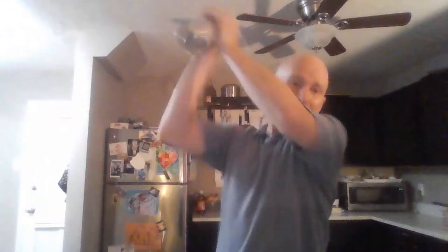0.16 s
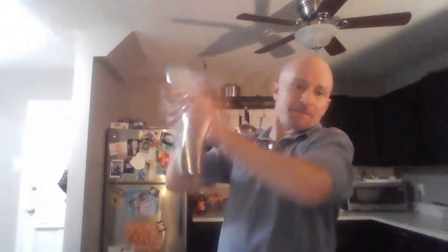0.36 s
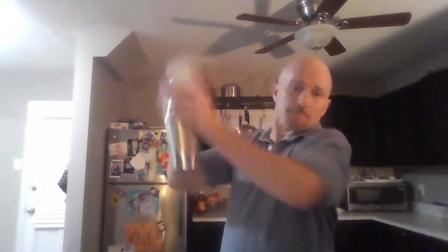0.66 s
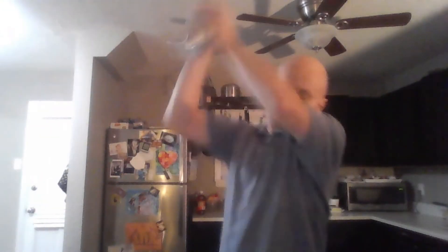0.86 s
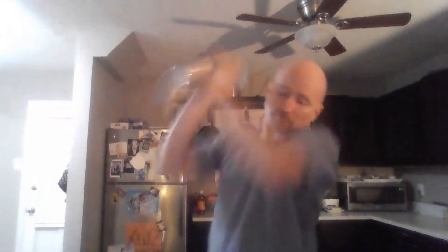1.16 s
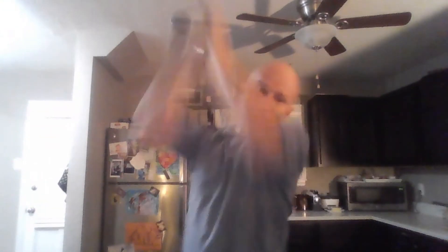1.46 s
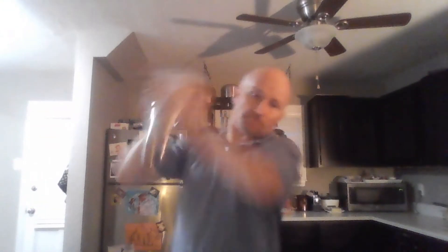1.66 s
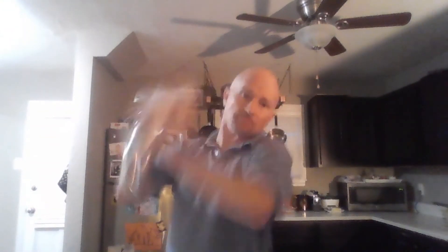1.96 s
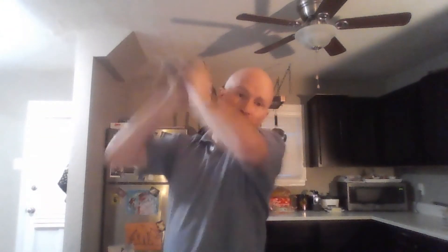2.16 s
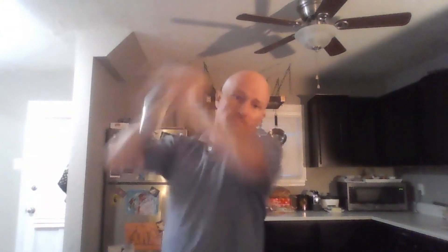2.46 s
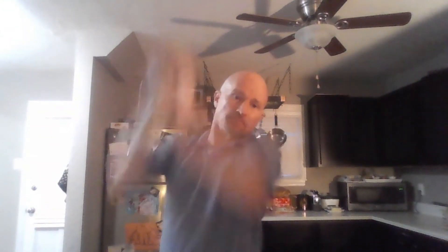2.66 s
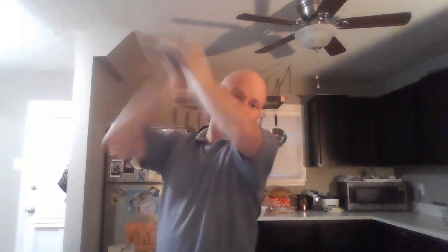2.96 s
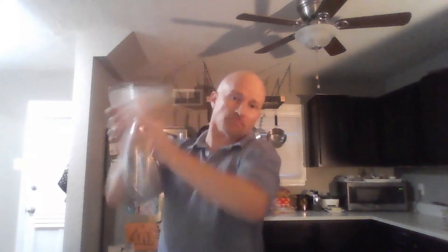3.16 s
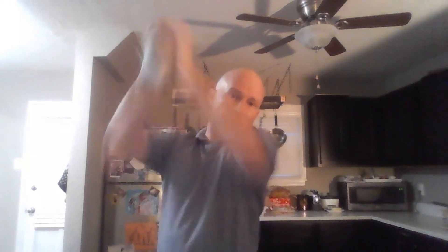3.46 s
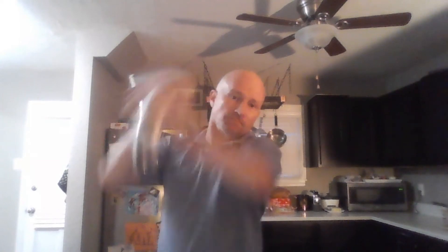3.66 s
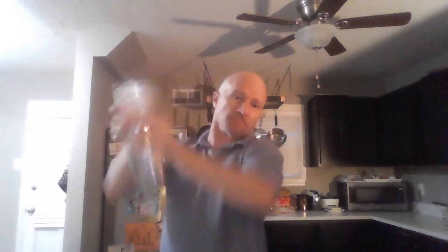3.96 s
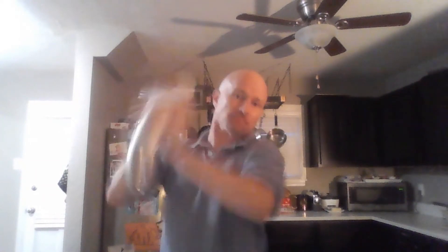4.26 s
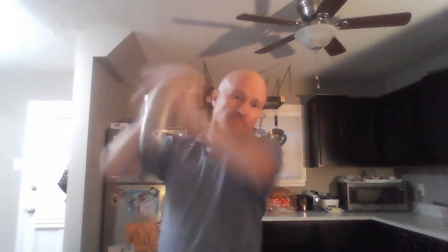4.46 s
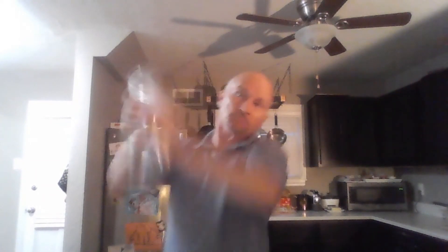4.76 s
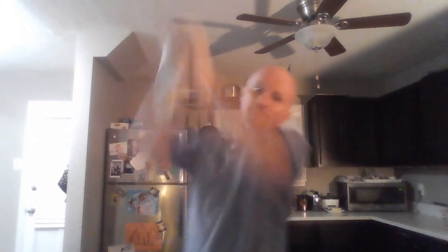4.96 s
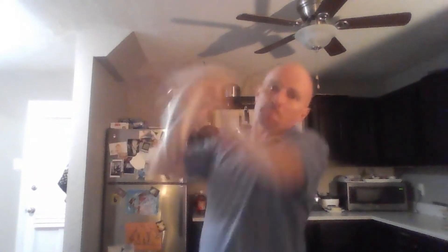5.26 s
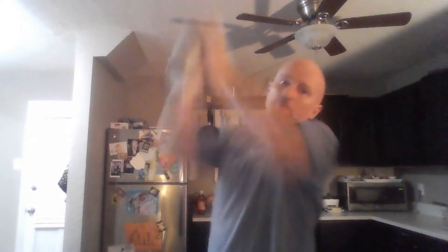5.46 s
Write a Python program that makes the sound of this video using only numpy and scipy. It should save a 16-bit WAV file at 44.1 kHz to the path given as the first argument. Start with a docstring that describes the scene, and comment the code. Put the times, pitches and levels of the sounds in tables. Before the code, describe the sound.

Ice rattles hard and liquid sloshes inside a steel and glass cocktail shaker, shaken in a fast rhythm in a kitchen.

```python
"""Kitchen: a steel and glass cocktail shaker, shaken hard a couple of metres from a small microphone.
Ice and liquid slam into one end five times a second; hands and liquid damp each knock within milliseconds.
The drink's mass lowers the tin's ring. Small ice rattles between strokes, the drink splashes and gurgles,
and the hard room smears it all."""
import sys
import numpy as np
from scipy import signal
from scipy.fft import rfft, irfft
from scipy.io import wavfile

SR = 44100
rng = np.random.default_rng(int(sys.argv[2]) if len(sys.argv) > 2 else 0)


def master(y):
    """Save y as 16-bit WAV."""
    cut = np.clip(np.atleast_2d(y).T, -1, 1)
    pcm = np.round(cut * 32767)  # scale
    wavfile.write(sys.argv[1], SR, pcm.astype(np.int16))


N = 246959

# small ice tumbling: t/s, level/dB
RATTLE_LEVELS = [(0.0, -43.5), (0.4, -38), (0.8, -34), (1.2, -33.5), (1.6, -37), (2.0, -35.5), (2.4, -36),
                 (2.8, -40), (3.2, -42), (3.6, -37.5), (4.0, -37), (4.4, -32.5), (4.8, -42), (5.2, -37),
                 (5.6, -33)]
# loudest cube strikes: t/s, ring level/dB, crack level/dB re ring
CUBE_KNOCKS = [(0.003, -35, 7.5), (0.072, -34, 2.5), (0.0935, -27.5, -4.5), (0.2208, -35.5, 1),
               (0.237, -23, -18), (0.3597, -33.5, 3.5), (0.4124, -43, 10), (0.439, -45, 12),
               (0.457, -47, 12), (0.4875, -26, 0), (0.4986, -30, -3), (0.599, -36.5, -2), (0.6381, -30, -7),
               (0.679, -32, -10), (0.7389, -33, -3.5), (0.756, -27.5, 0), (0.8076, -37, 7.5),
               (0.8489, -23, 2), (0.8517, -20, -14), (0.8639, -21.5, -5), (0.995, -29.5, -3.5),
               (1.009, -34.5, 2), (1.083, -43.5, 10.5), (1.1387, -37.5, 1.5), (1.1783, -43.5, 5.5),
               (1.2572, -37.5, 6.5), (1.294, -35, 0), (1.337, -30, 3), (1.3902, -18, -10.5),
               (1.4088, -33.5, 5), (1.425, -26, -13), (1.516, -33.5, -1.5), (1.5259, -33, -2),
               (1.5699, -29.5, 0.5), (1.659, -34, 9.5), (1.7207, -35.5, 7), (1.737, -38, 6),
               (1.7514, -47.5, 10.5), (1.7699, -27.5, -6), (1.7764, -21, -2.5), (1.7928, -29, 0),
               (1.8857, -31.5, -4.5), (1.92, -30, 5), (1.927, -25, -5), (1.9394, -25, 3),
               (2.0646, -42.5, 15.5), (2.1165, -40.5, 11.5), (2.1746, -23, -4), (2.2127, -31, 0),
               (2.2698, -25, 3.5), (2.279, -18.5, -4), (2.448, -27.5, -6.5), (2.469, -36, -7),
               (2.4916, -29, -2), (2.5218, -25, -11), (2.568, -30.5, -3.5), (2.6523, -38.5, -3),
               (2.761, -33.5, -5), (2.8256, -34, -1.5), (2.836, -39.5, 5), (2.866, -42, 11.5),
               (2.8802, -28.5, -8), (2.8982, -30, 5), (2.905, -34, -8), (2.9164, -24, -7.5),
               (3.0155, -34, -13), (3.043, -30.5, -6), (3.0675, -31, 2.5), (3.082, -24.5, 3),
               (3.0983, -37.5, 10), (3.1422, -29.5, 1.5), (3.2287, -32.5, 4.5), (3.262, -30, -10),
               (3.2782, -29.5, -4), (3.291, -40, 13), (3.312, -32, -5), (3.3479, -22, -10),
               (3.3599, -34, -15), (3.4395, -28.5, -8), (3.4968, -31, 5), (3.542, -28, -5.5),
               (3.6243, -36.5, 6), (3.663, -31, -0.5), (3.6783, -28, 4), (3.6854, -27, -4),
               (3.7129, -29.5, -1), (3.7368, -26, -3.5), (3.811, -31.5, -15), (3.8304, -42, -11),
               (3.862, -27.5, -0.5), (3.8836, -18, -5.5), (3.9363, -28, -3.5), (3.9954, -43, 9),
               (4.0682, -28, 5.5), (4.0843, -26, -4), (4.1205, -41.5, 6.5), (4.1612, -31.5, -1.5),
               (4.2214, -30.5, -1.5), (4.2432, -34, -1.5), (4.283, -27, -8), (4.3254, -29.5, 1.5),
               (4.4494, -31, -3), (4.454, -24.5, -22), (4.4602, -27.5, 1.5), (4.4883, -27, -5.5),
               (4.6355, -32.5, 1), (4.6611, -29, 0.5), (4.8212, -25, -9), (4.8648, -21, -11),
               (4.879, -26, -8), (4.9382, -37, -3), (5.0206, -31, -23), (5.0385, -34.5, 0.5),
               (5.0709, -18, -6), (5.1855, -28.5, -4), (5.192, -30.5, -2.5), (5.2504, -22, -3),
               (5.2758, -27.5, -10), (5.2895, -24, -6.5), (5.3123, -24.5, -9), (5.485, -23.5, -7)]
# cubes splitting: t/s, level/dB
CUBE_SNAPS = [(0.0725, -30.5), (0.488, -23.5), (0.827, -33), (0.857, -24), (1.0828, -28.5), (1.3916, -27),
              (2.0646, -32), (2.1745, -32)]
# drink piling up in one end: peak t/s, half length/s, splash level/dB, loaded ring f/Hz
SURGES = [(0.085, 0.037, -30, 1660), (0.497, 0.03, -37.5, 1540), (0.602, 0.014, -58, 1350),
          (0.862, 0.023, -42, 1730), (1.411, 0.049, -38.5, 1570), (1.516, 0.011, -36.5, 1210),
          (1.786, 0.051, -29, 1676), (1.885, 0.01, -44, 1230), (2.196, 0.031, -30.5, 1670),
          (2.516, 0.072, -34, 1466), (2.668, 0.021, -34, 1300), (2.903, 0.069, -29.5, 1590),
          (3.049, 0.015, -40, 1250), (3.311, 0.056, -37, 1540), (3.451, 0.018, -47, 1420),
          (3.718, 0.065, -31.5, 1680), (4.104, 0.056, -34, 1610), (4.218, 0.014, -36.5, 1470),
          (4.46, 0.039, -29.5, 1620), (4.623, 0.015, -32, 1690), (4.869, 0.035, -28, 1674),
          (5.02, 0.021, -51, 1410), (5.283, 0.057, -34, 1820)]
# large air pockets closing: t/s, f/Hz, level/dB
AIR_POCKETS = [(0.082, 220, -25.5), (0.858, 670, -23), (1.401, 574, -26), (2.269, 686, -23.5),
               (2.517, 497, -22.5), (3.348, 612, -35.5), (3.44, 896, -27.5), (4.217, 886, -24),
               (4.449, 571, -21.5), (4.467, 462, -21), (4.486, 364, -19.5), (4.936, 636, -29),
               (5.02, 864, -21.5)]
# ice pack landing at the end of a stroke: t/s, length/s, level/dB
PACK_LANDINGS = [(0.094, 0.0095, -38), (0.245, 0.044, -31), (0.485, 0.022, -25.5), (0.851, 0.021, -24.5),
                 (1.411, 0.014, -25), (1.775, 0.022, -40), (1.922, 0.034, -28), (2.178, 0.028, -41),
                 (2.273, 0.017, -23.5), (2.492, 0.034, -31.5), (2.69, 0.015, -25), (2.9, 0.035, -29.5),
                 (3.086, 0.033, -28), (3.288, 0.017, -34.5), (3.352, 0.014, -52), (3.498, 0.012, -27),
                 (3.678, 0.02, -30), (3.738, 0.01, -48), (3.864, 0.032, -28), (4.064, 0.022, -49),
                 (4.453, 0.014, -32), (4.66, 0.013, -27), (4.86, 0.026, -33), (5.071, 0.014, -28.5),
                 (5.254, 0.044, -33)]
# brittle ice contact: f/Hz, gain/dB
CONTACT_EQ = [(200, 9), (2400, 5.5), (4000, -0.5), (6000, -8), (9300, -13), (11000, -18.5), (13500, -10.5),
              (16000, -26)]
# kitchen echo: f/Hz, gain/dB
ECHO_EQ = [(100, 4), (300, -7), (800, -2), (1700, -3.5), (3500, -2.5), (8000, -2.5), (15000, -8.5)]
# kitchen decay: f/Hz, t60/s
ECHO_T60 = [(200, 0.35), (550, 0.44), (1400, 0.3), (3700, 0.3), (9700, 0.26), (16000, 0.63)]
# still room air: f/Hz, relative density/dB
AIR_SPECTRUM = [(30, -14), (100, 2.5), (160, 13.5), (400, 3), (2000, -40), (16000, -54)]
# microphone response: f/Hz, gain/dB
MIC_EQ = [(30, -22), (90, -16.5), (150, -1.5), (260, -3.5), (430, 2), (620, 2.5), (800, 2), (1050, 4),
          (1700, 2), (2400, 0), (5700, 5.5), (6600, 3.5), (9000, 7), (14000, -7), (15500, -4)]

HIT_S = np.arange(1024) / SR  # time axis of one hit
EMPTY_RING_HZ, RING_SCATTER = 1943, 0.093  # scatter: deviation of ln f
WEAR_DB_PER_S = 1.0  # cube edges round off, the top treble fades


def undb(db):
    """Decibels to gain."""
    return 10 ** (np.asarray(db) / 20)


def unit(x):
    """Scale to rms 1."""
    return x / np.sqrt(np.mean(x ** 2))


def struck(x):
    """Scale each row to rms 1 over its first 4 ms."""
    return x / np.sqrt(np.mean(x[:, :176] ** 2, axis=1, keepdims=True))


def fade(t, t60_s):
    """Exponential decay."""
    return np.exp(-np.log(1000) * t / t60_s)


def along(points, hz):
    """Interpolate (f/Hz, value) points over log frequency."""
    point_hz, values = np.transpose(points)
    return np.interp(np.log(np.maximum(hz, 1)), np.log(point_hz), values)


def colour(x, points, size=2048):
    """Minimum-phase filter from (f/Hz, gain/dB) points."""
    cepstrum = irfft(np.log(undb(along(points, np.fft.rfftfreq(size, 1 / SR)))))
    cepstrum[1:size // 2] *= 2
    cepstrum[size // 2 + 1:] = 0
    response = irfft(np.exp(rfft(cepstrum))).reshape((1,) * (x.ndim - 1) + (-1,))
    return signal.fftconvolve(x, response, axes=-1)[..., :x.shape[-1]]


def band(x, lo_hz, hi_hz, order=2):
    """Band-pass."""
    return signal.sosfilt(signal.butter(order, [lo_hz, hi_hz], "band", fs=SR, output="sos"), x)


def burst(count, t60_s, lo_hz, hi_hz):
    """One decaying noise band per row."""
    return struck(band(rng.standard_normal((count, len(HIT_S))) * fade(HIT_S, t60_s), lo_hz, hi_hz))


def place(at_s, sounds):
    """Sum short sounds onto the time line."""
    out = np.zeros(N)
    for start, sound in zip((np.maximum(at_s, 0) * SR).astype(int), sounds):
        out[start:start + len(sound)] += sound[:max(N - start, 0)]
    return out


def place_hits(at_s, level_db, parts):
    """Mix (rows, relative level/dB) parts and place the hits."""
    return place(at_s, sum(part * undb(level_db + rel_db)[:, None] for part, rel_db in parts))


def load(at_s):
    """Fill (0-1) and ring f/Hz of the struck end; the drink's mass lowers the ring."""
    peak_s, half_s, _, full_hz = np.transpose(SURGES)
    fills = np.exp(-((at_s[:, None] - peak_s) / half_s) ** 4)
    fill = fills.max(axis=1)
    return fill, EMPTY_RING_HZ + fill * (full_hz[fills.argmax(axis=1)] - EMPTY_RING_HZ)


def tin_ring(hz, t60_s, rise_s):
    """One damped mode per row, swelling while the ice presses on the wall."""
    mode = np.sin(2 * np.pi * hz[:, None] * HIT_S) * fade(HIT_S, t60_s)
    return struck(mode * (1 - np.exp(-HIT_S / rise_s)))


def ice_contact(count, tau_s, tones_db, tones_t60_s, seat_s=0.00024):
    """Brittle crack as ice seats on the wall, plus six short tones that vary with cube and strike point."""
    envelope = np.exp(-HIT_S / tau_s) * (1 - np.exp(-HIT_S / seat_s))
    crack = struck(rng.standard_normal((count, len(HIT_S))) * envelope)
    modes_hz = 2400 * (14000 / 2400) ** rng.random((count, 6)).T
    tones = sum(np.sin(2 * np.pi * hz[:, None] * HIT_S) * rng.standard_normal((count, 1))
                for hz in modes_hz)
    return colour(crack + undb(tones_db) * struck(tones * fade(HIT_S, tones_t60_s)), CONTACT_EQ)


def shards(at_s, level_db):
    """Pieces hit the wall: big ones ring it, small ones tick; a full end shifts clack towards tick."""
    detune, smallness = rng.standard_normal((len(at_s), 2)).T
    fill, ring_hz = load(at_s)
    ring = tin_ring(ring_hz * np.exp(0.11 * detune), t60_s=0.0071, rise_s=0.00041)
    crack = ice_contact(len(at_s), tau_s=0.0017, tones_db=-5.5, tones_t60_s=0.0066)
    clack = struck(band(crack, 2000, 6000))
    tick = struck(band(crack, 6000, 19000))
    return place_hits(at_s, level_db, [
        (ring, -3.5 - 3.6 * smallness),
        (clack, -0.8 - 1.7 * fill),
        (tick, -6 + 3 * smallness + 1.64 * fill - 0.45 * WEAR_DB_PER_S * at_s)])


def small_ice(count=1450):
    """Chips and glancing cubes rattle at random, a few large among many tiny."""
    jitter, smallness = rng.random((count, 2)).T
    at_s = (np.arange(count) + jitter) / count * N / SR
    rattle_db = np.interp(at_s, *np.transpose(RATTLE_LEVELS))
    return shards(at_s, rattle_db + 0.5 - 24.3 * smallness ** 0.78)


def liquid(count=1300, rise_s=0.01):
    """Drink flung with the cubes: short rising bubble tones over a splashing wash."""
    knock_s, knock_db, _ = np.transpose(CUBE_KNOCKS)
    peak_s, _, splash_db, _ = np.transpose(SURGES)
    t = np.arange(SR // 4) / SR
    stir_power = (undb(knock_db - 15)[:, None] * fade(t, 0.082)) ** 2
    splash_power = undb(splash_db)[:, None] ** 2 * np.minimum(t / rise_s, fade(t - rise_s, 0.34) ** 2)
    power = place(knock_s - 0.002, stir_power) + place(peak_s - rise_s, splash_power) + undb(-45.5) ** 2
    when, pitch, strength = rng.random((count, 3)).T
    hz = 230 * (1500 / 230) ** pitch[:, None]
    bubbles = np.sin(2 * np.pi * hz * HIT_S * (1 + 3 * HIT_S)) * fade(HIT_S, 11 / hz)
    churn = unit(place(when * N / SR, bubbles * undb(20 * strength)[:, None]))
    wash = unit(band(rng.standard_normal(N), 137, 1550))
    return undb(-11.5) * (churn + wash) * np.sqrt(power)


def knocks():
    """Each cube rings the end of the tin, thuds against the liquid and cracks in the treble."""
    at_s, level_db, crack_db = np.transpose(CUBE_KNOCKS)
    count = len(at_s)
    fill, ring_hz = load(at_s)
    detune, sharpness = rng.standard_normal((count, 2)).T
    # re a medium blow; harder ones crush the ice: longer, duller
    force_db = level_db + np.maximum(crack_db, 0) + 24.5
    crack_tau_s = 0.0022 * undb(0.33 * force_db)[:, None]
    ring_t60_s = 0.011 * undb(0.57 * force_db)[:, None]
    crack = ice_contact(count, crack_tau_s, tones_db=-7.5, tones_t60_s=0.017, seat_s=0.00046)
    shell = burst(count, t60_s=0.013, lo_hz=1156, hi_hz=2170)
    mode = tin_ring(ring_hz * np.exp(RING_SCATTER * detune), ring_t60_s, rise_s=0.0017)
    ring = struck(mode + undb(-8) * shell)
    thud = burst(count, t60_s=0.033, lo_hz=283, hi_hz=690)
    clack = struck(band(crack, 2260, 5700, order=3))
    # only sharp edges splinter up to the top octave
    edge_db = 3.5 - WEAR_DB_PER_S * at_s + 3 * sharpness
    edge = undb(edge_db)[:, None] * band(crack, 10000, 19000, order=3)
    tick = struck(band(crack, 6000, 10000, order=3) + edge)
    return place_hits(at_s, level_db, [
        (ring, -1 + fill),
        (thud, -20.5 + 8 * fill - 0.42 * force_db),  # liquid yields to a hard blow
        (clack, crack_db),
        (tick, crack_db - 7.5 + 3.5 * fill - 0.12 * force_db)])


def rebounds():
    """Each knocking cube bounces once more, softer."""
    at_s, ring_db, crack_db = np.transpose(CUBE_KNOCKS)
    lag, softness = rng.random((len(at_s), 2)).T
    knock_db = ring_db + 10 * np.log10(0.87 + undb(crack_db) ** 2)
    return shards(at_s + 0.004 + 0.013 * lag, knock_db - 7.5 - 7 * softness)


def splinters(count=260):
    """Flakes snap off with a high dry tick, fainter as edges wear; now and then a cube splits."""
    jitter, smallness = rng.random((count, 2)).T
    flake_s = (np.arange(count) + jitter) / count * N / SR
    fill, _ = load(flake_s)
    rattle_db = np.interp(flake_s, *np.transpose(RATTLE_LEVELS))
    flake_db = rattle_db - 4 + 6 * fill - WEAR_DB_PER_S * flake_s - 18 * smallness ** 0.83
    at_s, level_db = np.concatenate([CUBE_SNAPS, np.c_[flake_s, flake_db]]).T
    snaps = burst(len(at_s), t60_s=0.011, lo_hz=8900, hi_hz=18000)
    return place(at_s, snaps * undb(level_db)[:, None])


def stragglers(per_surge=4):
    """Cubes ride in on each surge and knock dully on the wall."""
    peak_s, half_s, splash_db, _ = np.repeat(SURGES, per_surge, axis=0).T
    count = len(peak_s)
    jitter, softness = rng.random((count, 2)).T
    progress = (np.arange(count) % per_surge + jitter) / per_surge
    at_s = peak_s + half_s * (2 * progress - 1)
    thud = burst(count, t60_s=0.013, lo_hz=208, hi_hz=970)
    _, ring_hz = load(at_s)
    detune = rng.standard_normal(count)
    ring = tin_ring(ring_hz * np.exp(RING_SCATTER * detune), t60_s=0.02, rise_s=0.0014)
    dull_knocks = place_hits(at_s, splash_db - 12 * softness, [(ring, -10), (thud, -5)])
    return dull_knocks + shards(at_s, splash_db - 2 - 6 * softness)


def glugs(t60_cycles=23.7, rise_s=0.002):
    """Large air pockets ring as liquid closes over them; the lower, the longer."""
    at_s, hz, level_db = np.transpose(AIR_POCKETS)[:, :, None]
    t = np.arange(SR // 5) / SR
    envelope = fade(t, t60_cycles / hz) * (1 - np.exp(-t / rise_s))
    return place(at_s[:, 0], undb(level_db) * np.sin(2 * np.pi * hz * t) * envelope)


def crunch(pieces=16):
    """At the end of a stroke the pack piles into the wall, piece upon piece."""
    start_s, length_s, pack_db = np.repeat(PACK_LANDINGS, pieces, axis=0).T
    jitter, smallness = rng.random((len(start_s), 2)).T
    progress = (np.arange(len(start_s)) % pieces + jitter) / pieces
    piece_db = pack_db + 10 * np.log10(length_s / 0.029) - 3.5 - 8 * smallness
    return shards(start_s + length_s * progress, piece_db)


def room_response(early_db=-8):
    """Echo from one position: sparse bounces off ceiling and cupboards, then a diffuse tail."""
    t = np.arange(16384) / SR
    spectrum = rfft(rng.standard_normal(len(t)))
    hz = np.fft.rfftfreq(len(t), 1 / SR)
    centres_hz, t60s_s = np.transpose(ECHO_T60)
    tail = sum(irfft(spectrum * along(np.c_[centres_hz, weights], hz)) * fade(t, t60_s)
               for weights, t60_s in zip(np.eye(len(centres_hz)), t60s_s))
    tail *= np.clip((t - 0.004) / 0.0049, 0, 1)
    early = rng.standard_normal(len(t)) * (rng.random(len(t)) < 0.03)
    early *= (t > 0.0025) * fade(t, 0.014)
    return colour(undb(early_db) * early / np.linalg.norm(early) + tail / np.linalg.norm(tail), ECHO_EQ)


def kitchen(direct, positions=12, positions_per_s=37):
    """The shaker moves, so its echo crossfades from one bounce pattern to the next."""
    position = np.arange(N) / SR * positions_per_s % positions
    echo = 0
    for k in range(positions):
        distance = np.abs((position - k + positions / 2) % positions - positions / 2)
        gain = np.sqrt(np.maximum(1 - distance, 0))
        echo = echo + signal.oaconvolve(direct * gain, room_response())
    # shaking already under way: the tail wraps to the start
    echo[:len(echo) - N] += echo[N:]
    return direct + echo[:N]


def scene():
    """Shaker in the kitchen over faint air noise, mono."""
    air = undb(-63.5) * unit(colour(rng.standard_normal(N), AIR_SPECTRUM))
    ice = knocks() + rebounds() + stragglers() + crunch() + small_ice() + splinters()
    return (kitchen(ice + liquid() + glugs()) + air)[None]


def record(dry, ceiling=0.98, asymmetry=0.047, low_hz=28, top_hz=16100):
    """Small microphone, thin in the bass; it rounds peaks unevenly, so hard blows add a low bump."""
    rounded = ceiling * np.tanh(colour(dry, MIC_EQ) / ceiling)
    skewed = rounded + asymmetry * rounded ** 2
    highpassed = signal.sosfilt(signal.butter(2, low_hz, "high", fs=SR, output="sos"), skewed)
    return signal.sosfilt(signal.ellip(10, 0.2, 80, top_hz, fs=SR, output="sos"), highpassed)


dry = scene()
out = record(dry)
master(out)
```